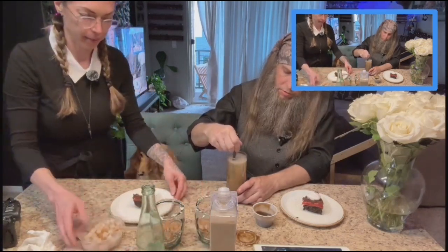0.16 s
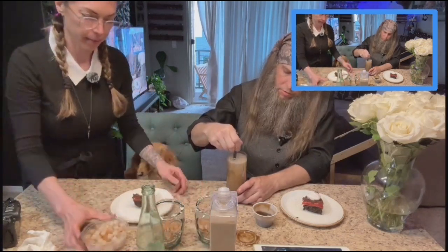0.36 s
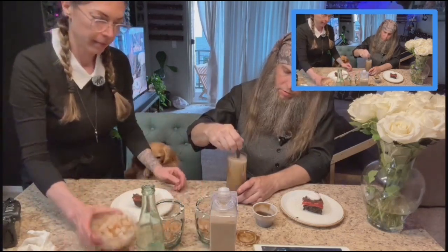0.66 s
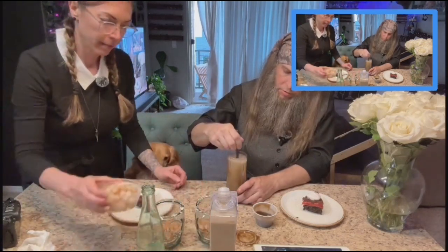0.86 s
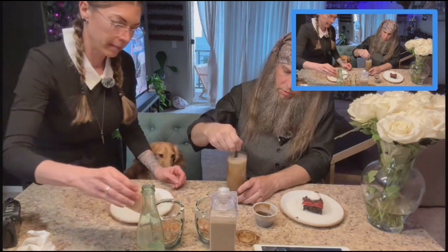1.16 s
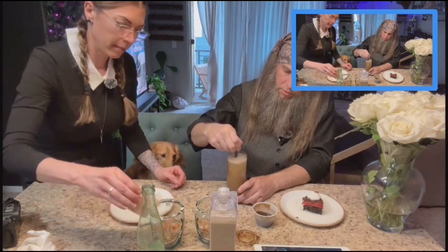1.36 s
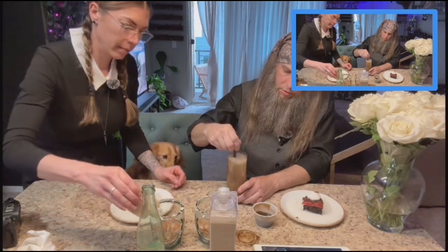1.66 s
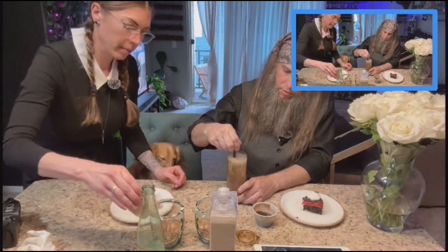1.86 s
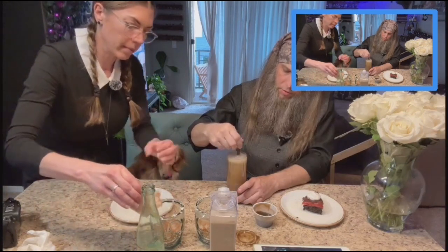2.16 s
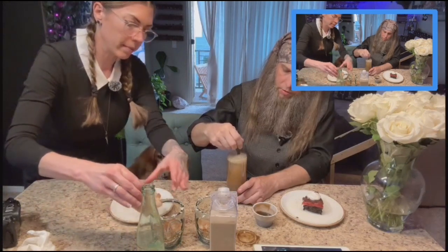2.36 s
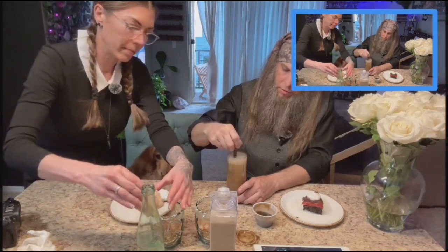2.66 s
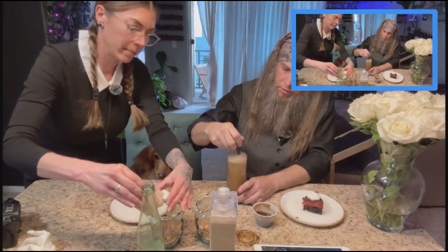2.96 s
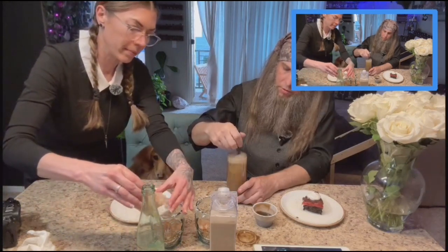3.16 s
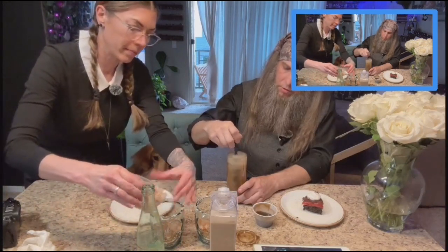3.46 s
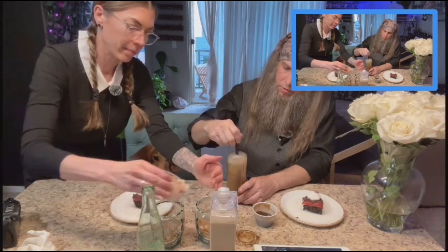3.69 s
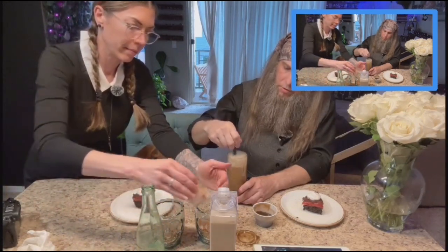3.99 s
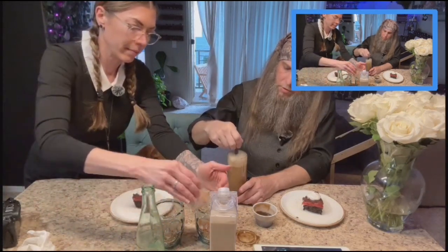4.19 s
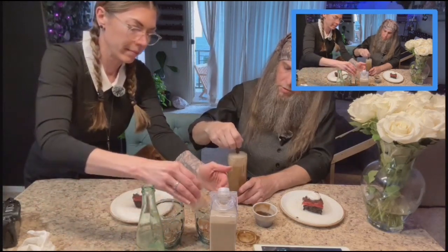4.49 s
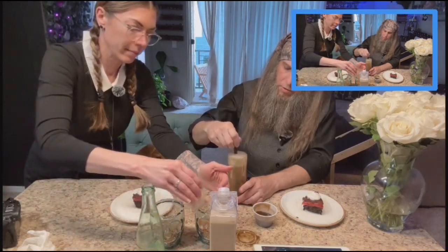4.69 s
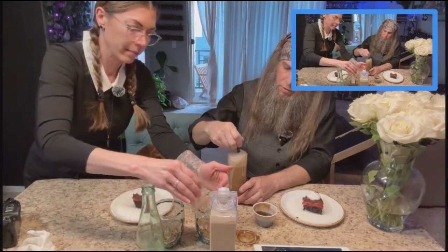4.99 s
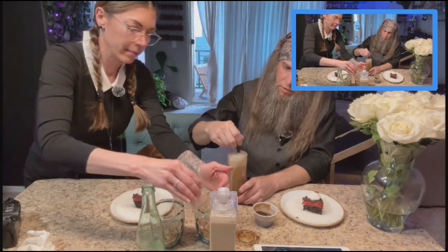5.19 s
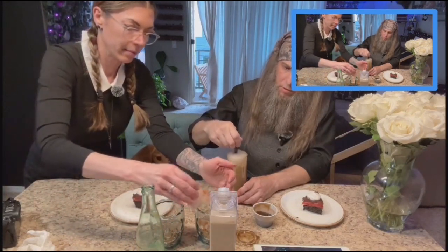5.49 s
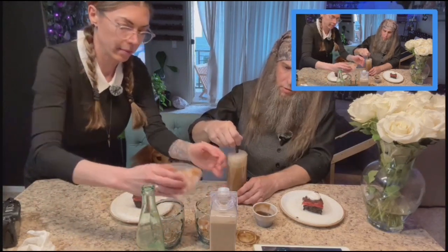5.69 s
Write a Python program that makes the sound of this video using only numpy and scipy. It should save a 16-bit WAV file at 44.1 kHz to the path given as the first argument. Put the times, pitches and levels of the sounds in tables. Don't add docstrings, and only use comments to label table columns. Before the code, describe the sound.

Close indoor sound of a long spoon stirring ice in a tall full glass. Rapid short cracks of ice on the damped wall come about five a second, with wooden-sounding knocks of the base on stone. The middle eases and the handle rings faintly; after four seconds the strokes are hardest, with dull cube clacks, then lighter brushes.

```python
import sys
import numpy as np
from scipy import signal
from scipy.fft import rfft, irfft
from scipy.io import wavfile
from scipy.ndimage import map_coordinates

SR = 44100
rng = np.random.default_rng(int(sys.argv[2]) if len(sys.argv) > 2 else 0)


def wav_out(sig):
    wavfile.write(sys.argv[1], SR, np.round(np.clip(np.atleast_2d(sig).T, -1, 1) * 32767).astype(np.int16))


def invert_db(level):
    return 10 ** (np.asarray(level, dtype=float) / 20)


N = 257544

# centre_hz, t60_s, level_db
ROOM_BANDS = [(252, 0.45, -4), (684, 0.27, 4), (1925, 0.18, 4.5), (4700, 0.17, 3), (7900, 0.16, 6.5),
              (15000, 0.22, -9.5)]
# freq_hz, gain_db
MIC_RESPONSE = [(25, -9), (70, -7), (150, -6), (13500, 1.5), (15000, -11.5), (15800, -28), (16600, -51.5),
                (17000, -110)]
# freq_hz, density_db_per_hz
AIR_SPECTRUM = [(20, 13), (60, -9), (120, -1), (250, -10), (400, -16), (800, -22), (2000, -40.5),
                (15000, -50)]
# time_s, level_db
AIR_LEVEL_CURVE = [(0.0, -49.5), (.13, -51), (.2, -60.5), (0.55, -69.5), (1.75, -65.5), (2.1, -61.5),
                   (2.6, -68), (3.76, -76.5), (4.9, -63), (5.84, -75)]
# freq_hz, level_db
HUM_LINES = [(50, -77.5), (100, -93.5), (148, -80.5), (198, -80), (245, -84), (293, -73), (390, -91)]
# start_s, end_s, rub_db, fizz_db
RUBS = [(.47, 0.598, -71, -64), (.66, .7, -81, -79), (1.01, 1.086, -65.5, -58), (1.216, 1.355, -47.5, -56),
        (1.864, 1.904, -53.5, -61), (2.033, 2.112, -86, -76), (2.408, 2.496, -73.5, -83),
        (3.2, 3.35, -50, -68), (3.42, 3.51, -62, -74), (3.95, 4.006, -72, -79),
        (4.054, 4.195, -57.5, -69.5), (4.34, 4.52, -40, -53.5), (4.598, 4.62, -48, -52),
        (4.67, 4.755, -37.5, -56), (5.201, 5.263, -54, -63), (5.358, 5.46, -45.5, -62),
        (5.57, 5.613, -75, -62)]
# freq_hz, density_db_per_hz
RUB_SPECTRUM = [(250, -63), (500, 5.5), (1200, 14), (2700, 3), (4000, -14.5), (10000, -22.5), (15500, -32)]
# freq_hz, density_db_per_hz
FIZZ_SPECTRUM = [(1200, -41), (2300, 2.5), (3300, -4), (4200, -2), (7000, -7), (10000, -5.5), (15500, -16)]
# freq_hz, t60_s, level_db
SPOON_MODES = [(2051, .13, 0), (2066, .13, 0), (5445, .07, 0), (5330, .09, -6), (8323, .05, -20),
               (9800, .04, -20), (13560, .05, -28), (15190, .05, -22)]
# start_s, peak_db, overtone_db, beating_partner_db
SPOON_RINGS = [(1.498, -56, -34.5, -11), (2.2218, -64.5, -14, -7), (2.6845, -46, -15, -11.5),
               (2.981, -39, -7.5, -16), (3.0694, -67.5, -12, -4), (3.3483, -54, -25, -5.5),
               (3.342, -72, 10, -4), (3.375, -68, 8, -4), (3.41, -68, 8, -4), (3.5783, -80.5, -12.5, -7.5),
               (4.895, -56, -5, -2), (4.9513, -57.5, -14.5, -13.5), (5.6211, -67, -22, -6),
               (2.735, -59.5, -6, -6.5)]
# start_s, peak_db, pitch_hz, overtone_db, wall_glance_db
CUBE_CLACKS = [(.687, -57, 820, -7, -59), (1.067, -42, 1410, -28, -37), (1.23, -22, 2100, 3, -28),
               (1.304, -26.5, 1360, -11.5, -35), (1.311, -20, 1450, -13.5, -23.5),
               (1.322, -23.5, 1510, -7.5, -27.5), (1.87, -28.5, 1450, -3, -42),
               (1.889, -40.5, 835, 6, -41.5), (2.419, -20.5, 1274, -11, -50), (3.261, -37, 1100, 0, -47),
               (3.285, -29.5, 1060, -11, -40), (3.443, -53, 800, -6.5, -49),
               (3.466, -34.5, 1010, -3, -48.5), (4.346, -27, 795, -19, -32),
               (4.38, -13.5, 1280, -4.5, -20.5), (4.535, -18, 850, -11, -23.5), (4.56, -27, 900, 1, -32),
               (4.642, -14, 600, -3, -53), (4.743, -12.5, 1214, -8.5, -36), (5.051, -22.5, 1965, -2, -29),
               (5.225, -34.5, 753, -6, -39), (5.421, -31, 1160, -15, -27), (5.452, -20, 1220, -20, -42.5),
               (5.46, -11.5, 1120, -8, -34), (.57, -59, 1530, -0.5, -67), (1.161, -57, 1450, -10, -60),
               (2.41, -28, 1090, -1, -56), (2.434, -46.5, 1190, -9.5, -57), (2.497, -52.5, 1000, -6, -63.5),
               (3.194, -35, 1470, -6, -48), (3.297, -43, 1290, -3, -54), (3.326, -53.5, 1420, 3, -58),
               (3.339, -53, 1300, -2, -57), (3.97, -53.5, 1130, 9, -61), (4.606, -6, 1010, -12, -41.5),
               (5.166, -56, 1190, -3, -64.5), (5.289, -61, 1020, -11, -64), (5.318, -53, 1200, -8, -65),
               (5.393, -28.5, 1250, -5, -46), (5.48, -28, 1200, -6, -53)]
# freq_hz, t60_s, level_db, group (0 body, 1 middle, 2 edge)
TABLE_MODES = [(156, 0.069, -21, 0), (449.4, 0.23, -9, 0), (560, 0.043, -2.5, 0), (678.4, 0.076, -3, 1),
               (808.5, 0.1, -5.5, 1), (881, 0.087, -8, 1), (1010, 0.048, -5.5, 1), (1205, .04, -7.5, 0.82),
               (1331, 0.033, 0, 1), (1609, 0.027, 1.5, 2), (1881, 0.026, 1, 2), (2464, 0.015, -3.5, 2),
               (3100, 0.018, -8.5, 2), (3850, 0.06, -23.5, 2)]
# start_s, peak_db, pitch_hz, body_db, t60_s
BASE_THUDS = [(.026, -6, 957, -8, 0.031), (.212, -8, 832, -12, 0.049), (0.771, -1.5, 445, -18, 0.036),
              (1.372, -12.5, 835, -7.5, 0.036), (1.55, -6, 447, -19.5, 0.049),
              (2.328, -12.5, 914, -10, 0.028), (4.206, -4.5, 828, -12, 0.043),
              (4.407, -1, 1447, -14.5, 0.021), (4.589, -2.5, 857, -17, 0.048),
              (4.811, -21, 1040, -35.5, 0.022), (4.993, -21, 825, -4, 0.048), (5.359, -23, 820, -18, 0.051)]
# start_s, peak_db, pitch_hz, body_db, edge_db
GLASS_NUDGES = [(0.424, -29.5, 1470, -21, -33), (.6, -29.5, 1315, -26, -27), (0.612, -40.5, 1235, 4, -30.5),
                (0.982, -37.5, 1366, -24, -17), (1.196, -29.5, 1330, -31.5, 1), (1.77, -26, 820, -20, -29),
                (1.968, -25, 1386, -12, -10), (2.149, -20.5, 1440, -7.5, -34),
                (2.539, -30.5, 616, -2.5, 1.5), (2.758, -38.5, 668, 5.5, -11),
                (2.934, -29, 1440, -15, -8.5), (2.955, -27, 1660, -9.5, -9),
                (3.169, -27.5, 1316, 5.5, 11.5), (3.42, -44, 560, -5, -10), (3.687, -29.5, 444, -7.5, -6),
                (3.814, -32, 1540, -39, 5.5), (3.887, -38.5, 580, -2, -14), (4.01, -32.5, 925, -41, -31),
                (4.035, -31.5, 774, -24, -5), (4.141, -58, 1250, -32, -2), (5.244, -38, 1240, -27, -5),
                (5.599, -36, 540, -9.5, -16), (5.773, -33, 673, -20.5, -8.5), (3.147, -40.5, 600, -12, -7),
                (5.349, -22, 987, -11.5, -7.5), (5.545, -36.5, 756, -19, -20), (5.723, -48, 575, 3, -10),
                (3.68, -32, 700, -7.5, -18)]
# freq_hz, t60_s, level_db, group (0 low, 1 middle, 2 upper)
WALL_MODES = [(2815, 0.0087, 1, 0), (4417, 0.0071, -5, 1), (4746, 0.005, -3, 2), (5845, 0.012, -14, 1),
              (6960, 0.0046, 2, 2), (7570, 0.0067, -4.5, 2), (8720, 0.0058, -5.5, 2), (9590, 0.0056, -7, 2),
              (11090, 0.0038, -10, 2), (13200, 0.0067, -19.5, 2), (14300, .004, -9.5, 2)]
# freq_hz, t60_s, level_db, group
DRY_WALL_MODES = [(4060, .04, -15, 1), (4260, .04, -16, 1), (6900, .03, -15, 2), (7350, .03, -17, 2)]
# start_s, peak_db, cube_hz, low_db, upper_db
FIRST_STRIKES = [(.0252, -14, 3560, 0, -18), (.2197, -27.5, 3340, -8, -33), (.4222, -7.5, 4440, -4, -3),
                 (.5985, -13.5, 3880, -21, -11), (.7982, -5, 4420, 5.5, 1), (1.1807, -21, 3380, -14, -5.5),
                 (1.3838, -10, 3330, 0, -7.5), (1.5758, -11, 3740, 7, -10), (1.7627, -9, 3867, -9, -5.5),
                 (1.9675, -8.5, 4395, -0.5, -4), (2.1462, -13, 3410, 2.5, -5), (2.3291, -21, 3240, 0, -8.5),
                 (2.5391, -8.5, 4510, 1.5, 5), (2.9368, -11.5, 4440, -5.5, -0.5),
                 (3.149, -13, 4620, 7.5, 9), (3.8152, -14, 3850, -9.5, -11.5), (4.0108, -10, 3100, -2, -6),
                 (4.2334, -7.5, 3643, -23, -13), (4.4264, -2, 3547, -7, -2), (4.6389, -14.5, 3380, 9, 8),
                 (4.8112, -2.5, 4540, -4, 2), (4.991, -1, 4760, 2, 7), (5.3493, -5.5, 4680, -0.5, -0.5),
                 (5.5463, -19, 3290, 7, 2)]
# start_s, peak_db, cube_hz, low_db, upper_db
PILED_CUBES = [(.0429, -12, 3570, -1.5, -5.5), (0.053, -15.5, 4600, 4, -18), (0.235, -16, 4330, 4.5, -2),
               (0.4425, -13.5, 3800, -1, -2), (0.606, -18, 3630, 6.5, -33),
               (0.6137, -16.5, 4065, -7.5, -9.5), (.809, -7, 4600, 9, 4), (0.8156, -16.5, 3570, -11, -19),
               (1.19, -14.5, 3617, -14, -4), (1.3942, -21.5, 4450, -8, -9), (1.4024, -16.5, 4320, 5.5, 0),
               (1.591, -14.5, 3480, -29, -4), (1.7739, -8, 4450, 11.5, 12.5), (1.988, -17, 3890, -31, -10),
               (2.1586, -13.5, 3275, -6, -9), (2.338, -21, 3900, -12.5, -21.5),
               (2.9543, -7.5, 4340, 4, 6.5), (3.1653, -14.5, 4240, -6.5, 0), (4.0355, -17.5, 3500, 2, -3.5),
               (4.2455, -21, 3820, 20, 9), (4.438, -10.5, 3600, 18, 17), (4.8307, -22, 4150, -3, 3),
               (5.0112, -11, 4430, 0, 7.5), (5.3682, -10, 4310, -16, -3.5), (3.6815, -33, 4140, 5, 14),
               (3.6955, -18.5, 4070, -9, 5), (3.706, -23, 4370, -1, 11), (.4465, -18, 4200, -8, 4),
               (5.0075, -20, 4140, -7, -1), (2.9415, -23, 4200, -10, -4), (.525, -44, 3800, 0, 7),
               (3.039, -34, 3300, 2, -6), (.7735, -26.5, 3850, 9, -32), (1.9725, -20, 4000, -7, -6)]
# start_s, peak_db, low_db, upper_db
STRAY_BRUSHES = [(.9807, -25, -6.5, -1.5), (.9907, -23, -12, -15), (1.0872, -41, -10, 9),
                 (1.278, -37.5, -9.5, -3), (1.584, -20, -15, -13), (2.3429, -17, -1, -8),
                 (2.7546, -23, 13.5, 15.5), (3.027, -31, -5, -4), (3.179, -24.5, -2, -3),
                 (3.4189, -40.5, 12, 17), (3.686, -31, 6, 1.5), (3.699, -22.5, 1.5, 9.5),
                 (3.8826, -33, -5, 3), (3.8916, -40, -14, 1), (3.98, -44, 19, 11), (4.0297, -14.5, -17, -1),
                 (4.1414, -45.5, 8, 8), (4.221, -30.5, -0.5, 12), (4.327, -34, 5.5, -12),
                 (4.367, -38.5, -2, -6), (4.409, -15.5, 9.5, -20), (4.4236, -19.5, 7, -1.5),
                 (4.687, -42, 11, 7), (4.7254, -22.5, -8, 1), (5.187, -32, 10, 9), (5.2458, -30.5, 12, 7),
                 (5.564, -38, -29, -25), (5.5984, -29.5, 4, 9), (5.7236, -23, 19.5, 13.5),
                 (5.774, -27, 2, 11), (.058, -21.5, 2, -11.5), (.2295, -23.5, 0, -13),
                 (.6638, -45.5, -1, -6.5), (1.1997, -15, 8.5, -10), (1.4098, -18, -3, 2),
                 (1.8977, -34, 3, -4), (2.0143, -27, 0, 3), (2.1768, -24, -2, 0), (2.5585, -20, -1, 19),
                 (3.2552, -44, 5, -16), (3.8328, -33, -15, 4), (3.988, -43, 8, 5), (4.0423, -36, -2, 7),
                 (4.4914, -34.5, -4, 2.5), (4.752, -31.5, -2, -9), (4.872, -32.5, -2.5, 2),
                 (5.205, -38, 0, 0), (5.6054, -49.5, 1, 12), (5.743, -42, -7, 8), (5.782, -41, -3, 5)]
# low_db, upper_db
GLANCE_WALL_DB = (4.5, -7)

LEAD_S = 0.006


def unit(x):
    return x / np.sqrt(np.mean(x ** 2) + 1e-20)


def along(points, hz):
    f, v = np.transpose(points)
    return np.interp(np.log(hz + 1), np.log(f + 1), v)


def curve(rows):
    s, v = np.transpose(rows)
    return np.interp(np.arange(N) / SR, s, v)


def noise(spectrum):
    gain = invert_db(along(spectrum, np.fft.rfftfreq(N, 1 / SR)))
    return unit(irfft(rfft(rng.standard_normal(N)) * gain, N))


def ring(t, hz, t60_s, db, attack_s):
    hz, t60_s, db = (np.asarray(v)[:, None] for v in (hz, t60_s, db))
    modes = invert_db(db - 60 * t / t60_s) * np.sin(2 * np.pi * hz * t)
    return np.sum(modes, 0) * (1 - np.exp(-(t / attack_s) ** 2))


def chatter(after_s, lead_db, drag_db):
    t = np.arange(SR // 25) / SR - round(LEAD_S * SR) / SR
    db = np.where(t < 0, lead_db + 25 * t / LEAD_S, drag_db - 60 * (t / after_s) ** 3)
    touches = invert_db(db) * rng.standard_normal(len(t)) * (rng.random(len(t)) < 0.12)
    touches[t == 0] = 1
    return touches


def after_lead(x):
    return np.pad(x, (round(LEAD_S * SR), 0))


def room():
    t, hz = np.arange(SR // 4) / SR, np.fft.rfftfreq(N, 1 / SR)
    centres_hz = [row[0] for row in ROOM_BANDS]
    shares = [along(list(zip(centres_hz, row)), hz) for row in np.eye(len(ROOM_BANDS))]
    bands = irfft(rfft(rng.standard_normal(N)) * shares, N)
    build = np.clip((t - 0.003) / 0.018, 0, 1) ** 0.15
    fades = np.array([invert_db(db - 60 * t / t60_s - 260 * t ** 2) for _, t60_s, db in ROOM_BANDS]) * build
    scale = np.sqrt(np.sum(fades[2] ** 2))

    def tail(place):
        start = int(place * (N - len(t)))
        return np.sum(bands[:, start:][:, :len(t)] * fades, 0) / scale

    return tail


def add(out, s, peak_db, hit, aside, tail):
    gain = invert_db(peak_db) / np.max(np.abs(hit))
    wet = signal.fftconvolve(aside, tail)
    out[round(s * SR):][:len(wet)] += gain * wet
    out[round((s - LEAD_S) * SR):][:len(hit)] += gain * hit


def air():
    t = np.arange(N) / SR

    def sway():
        return map_coordinates(rng.standard_normal(64), [t * 1.4])

    hum = sum(invert_db(db + 1.6 * sway()) * np.sin(2 * np.pi * hz * t + 0.61 * sway())
              for hz, db in HUM_LINES)
    return invert_db(curve(AIR_LEVEL_CURVE) + 12) * noise(AIR_SPECTRUM) + hum


def slosh():
    swell_db_per_s, settle_db_per_s = 396, 402.5
    levels = invert_db(4.5 * rng.standard_normal(N // 200 + 2))
    clumps = np.interp(np.arange(N) / 200, np.arange(len(levels)), levels)
    t, gains = np.arange(N) / SR, np.zeros((2, N))
    for start_s, end_s, *db in RUBS:
        near = slice(round((start_s - 0.2) * SR), round((end_s + 0.2) * SR))
        fade_db = swell_db_per_s * np.maximum(start_s - t[near], 0)
        fade_db += settle_db_per_s * np.maximum(t[near] - end_s, 0)
        gains[:, near] += np.outer(invert_db(db), invert_db(-fade_db))
    rub = gains[0] * unit(clumps * noise(RUB_SPECTRUM))
    fizz = gains[1] * unit(clumps * noise(FIZZ_SPECTRUM))
    return rub + fizz


def spoon(tail):
    out, t = np.zeros(N + SR), np.arange(SR // 6) / SR
    hz, t60_s, db = np.transpose(SPOON_MODES)
    for s, peak_db, over_db, partner_db in SPOON_RINGS:
        levels_db = db + over_db * (hz > hz[1]) + partner_db * (hz == hz[1])
        song = ring(t, hz, t60_s, levels_db, 0.0027)
        add(out, s, peak_db + 9, after_lead(song), invert_db(-9.5) * song, tail(rng.random()))
    return out[:N]


def clacks(tail):
    ratio, t60_s = np.array([1, 0.75, 1.3, 2.4, 1.6]), [0.023, 0.012, 0.0088, 0.014, 0.011]
    over_share = np.array([0, 1.2, 1.6, 1.5, 1.9])
    out, t = np.zeros(N + SR), np.arange(SR // 30) / SR
    for s, peak_db, hz, over_db, _ in CUBE_CLACKS:
        wet_db = -10 - 0.1631 * peak_db
        note = ring(t, hz * ratio, t60_s, over_db * over_share, 0.00042)
        aside = note * invert_db(wet_db + 4 - 60 * t / 0.016)
        add(out, s, peak_db, after_lead(note), aside, tail(rng.random()))
    return out[:N]


def knocks(tail):
    thud_edge_db, nudge_t60_s = -8.5, 0.052
    out, t = np.zeros(N + SR), np.arange(SR // 10) / SR
    hz, t60_s, db, group = np.transpose(TABLE_MODES + TABLE_MODES)
    blows = [(*row[:4], thud_edge_db, row[4]) for row in BASE_THUDS]
    blows += [(*row, nudge_t60_s) for row in GLASS_NUDGES]
    chance = rng.standard_normal((len(blows), 2, len(hz)))
    for (s, peak_db, note_hz, body_db, edge_db, last_s), (detune, vary) in zip(blows, chance):
        last_s = max(last_s, 0.008)
        levels_db = db + 2 * vary
        levels_db += np.take([body_db, -7, edge_db - 5], group.astype(int))
        table = ring(t, hz * (1 + 0.022 * detune), t60_s * last_s / 0.047, levels_db, 0.0019)
        note = ring(t, [note_hz], [0.7 * last_s], [-5], 0.001)
        hit = signal.fftconvolve(table + note, chatter(last_s, lead_db=-16.5, drag_db=-18.5))
        blur = invert_db(-60 * t / 0.018)
        aside = invert_db(10.5) * blur * (table + note)
        add(out, s, peak_db - 0.5, hit, aside, tail(rng.random()))
    return out[:N]


def contacts():
    strays = STRAY_BRUSHES + [(s, wall_db, *GLANCE_WALL_DB) for s, *_, wall_db in CUBE_CLACKS]
    pitch_hz = 3900 * (1 + 0.19 * rng.standard_normal(len(strays)))
    brushes = [(s, db, hz, low, up) for (s, db, low, up), hz in zip(strays, pitch_hz)]
    return FIRST_STRIKES + PILED_CUBES + brushes


def ice(tail):
    cube_db, stray_note_db = -1, -7
    clean_lead_db, crowded_lead_db = -20, -11.5
    crack_t60_s, blur_t60_s = 0.0089, 0.013
    out, t = np.zeros(N + SR), np.arange(SR // 25) / SR
    hz, t60_s, db, group = np.transpose(WALL_MODES)
    slow_hz, slow_t60_s, slow_db, slow_group = np.transpose(DRY_WALL_MODES)
    group, slow_group = np.round(group).astype(int), np.round(slow_group).astype(int)
    hits = contacts()
    chance = rng.standard_normal((len(hits), 2, len(WALL_MODES)))
    order = np.arange(len(hits))
    leads_db = np.where(order < len(FIRST_STRIKES), clean_lead_db, crowded_lead_db)
    notes_db = cube_db + np.where(order < len(FIRST_STRIKES + PILED_CUBES), 0, stray_note_db)
    for row, (detune, vary), lead_db, note_db in zip(hits, chance, leads_db, notes_db):
        s, peak_db, cube_hz, low_db, upper_db = row
        groups_db = cube_db + np.array([low_db, 0, upper_db])
        wall_db = db + 2.5 * vary + groups_db[group]
        wall = ring(t, hz * (1 + 0.021 * detune), t60_s, wall_db, 0.0003)
        cube = ring(t, [cube_hz], [0.011], [note_db], 0.00038)
        linger_hz = slow_hz * (1 + 0.02 * detune[:len(DRY_WALL_MODES)])
        linger = ring(t, linger_hz, slow_t60_s, slow_db + groups_db[slow_group], 0.00016)
        crack = np.diff(rng.standard_normal(len(t) + 1))
        crack *= invert_db(0.5 * upper_db - 60 * t / crack_t60_s)
        direct = wall + cube + invert_db(-22.5) * crack
        hit = signal.fftconvolve(direct, chatter(crack_t60_s, lead_db, drag_db=-15.5))
        aside = (wall + cube) * invert_db(-60 * t / blur_t60_s) + linger + invert_db(-23) * crack
        wet_db = 1 + 0.2461 * peak_db
        add(out, s, peak_db + 4, hit, invert_db(wet_db) * aside, tail(rng.random()))
    return out[:N]


def scene():
    tail = room()
    struck = invert_db(-3) * ice(tail) + knocks(tail) + clacks(tail) + spoon(tail)
    return (struck + slosh() + air())[None]


def roll_off(x):
    return signal.sosfilt(signal.butter(12, 16500, fs=SR, output="sos"), x)


def record(dry):
    gain = invert_db(along(MIC_RESPONSE, np.fft.rfftfreq(N, 1 / SR)))
    heard = irfft(rfft(dry) * gain, N)
    held = heard / (1 + np.abs(heard / 0.93) ** 6) ** (1 / 6)
    return roll_off(held)


dry = scene()
out = record(dry)
wav_out(out)
```